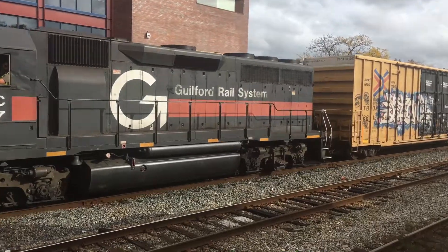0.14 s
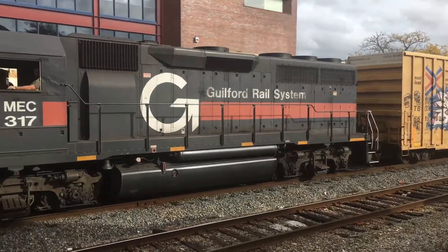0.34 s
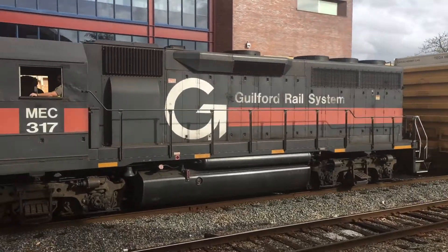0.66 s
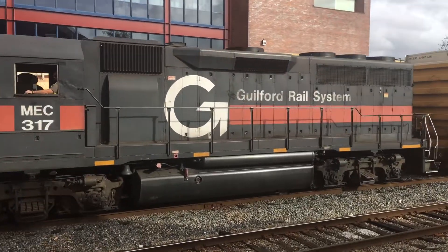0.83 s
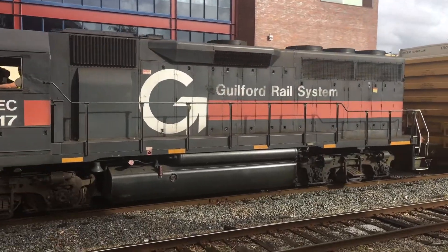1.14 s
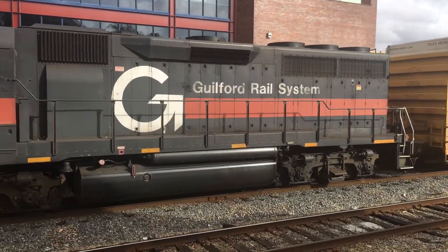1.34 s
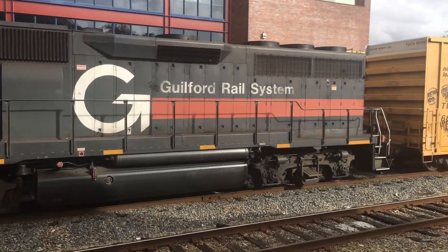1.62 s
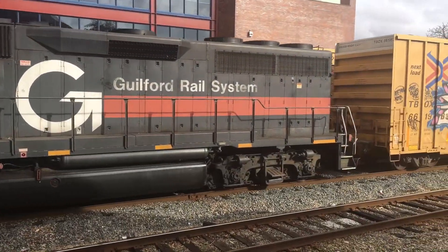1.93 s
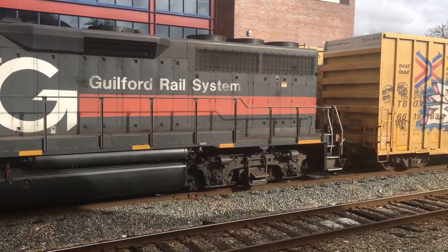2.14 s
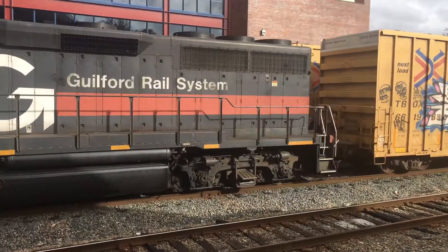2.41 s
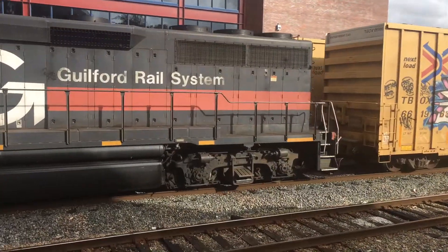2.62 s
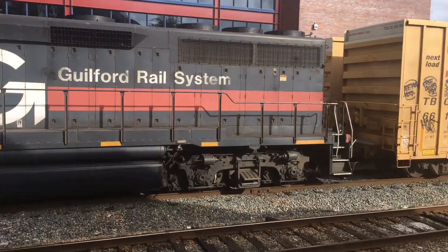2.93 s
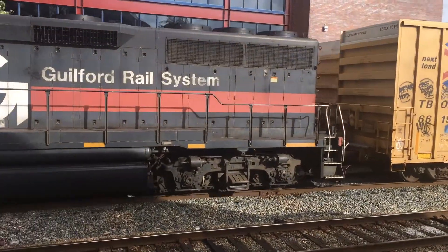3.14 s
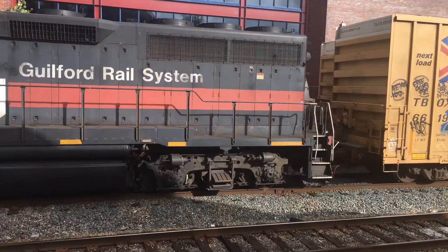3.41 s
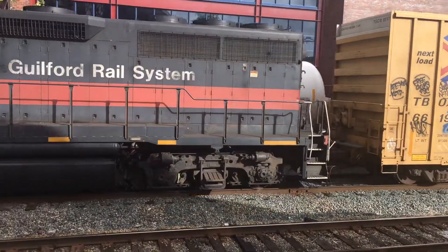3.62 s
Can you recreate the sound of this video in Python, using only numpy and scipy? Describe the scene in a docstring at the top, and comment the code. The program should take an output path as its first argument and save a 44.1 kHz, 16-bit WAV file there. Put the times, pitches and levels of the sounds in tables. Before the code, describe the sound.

Close mono outdoor pickup of a slow diesel engine: steady bass throb, fan roar and hum, strengthening turbo whine, soft early wheel thuds, then louder clustered metallic knocks, with a shifting echo from a nearby building.

```python
"""In front of a brick building, a two-stroke diesel locomotive rolls slowly past, a few metres away, at low revs.
Crank orders throb in the bass as sines; the building's echo sweeps notches through them as the engine moves.
Filtered noise makes the rumble, fan roar and hums; a fuzzy turbocharger whistle and a gear tone lie above.
Wheels clack over rail joints as grit, ringing knocks and thuds; two faint brake squeaks are short high sines."""
import sys
import numpy as np
from scipy import signal
from scipy.fft import rfft, irfft, next_fast_len
from scipy.io import wavfile
from scipy.ndimage import uniform_filter1d

SR = 44100
rng = np.random.default_rng(int(sys.argv[2]) if len(sys.argv) > 2 else 0)


def dump_mix(stems):
    """Bounce the given channels to the path in sys.argv[1] as a 16-bit WAV at rate SR."""
    frames = np.atleast_2d(stems).T  # one column per channel
    limited = np.clip(frames, -1, 1)  # hard clip at full scale
    pcm = np.round(limited * 32767).astype(np.int16)
    wavfile.write(sys.argv[1], SR, pcm)


def how_loud(loudness_db):
    """Turn decibels into a plain amplitude multiplier (0 dB gives 1, 20 dB gives 10)."""
    steps = np.asarray(loudness_db, float) / 20
    return 10 ** steps


N = 166257

# Level curves of roar and whistle; the roar columns act relative to the third row:
# time_s [s], bass_db [dB], mids_db [dB], treble_db [dB], whistle_db [dB]
LEVELS = [(0.02, -33, -38, -49, -45.5), (0.27, -33, -36, -54.5, -43.5), (0.79, -37, -38, -57.5, -45),
          (1.0, -32.5, -36, -52.5, -40), (1.21, -32.5, -37, -51, -44), (1.43, -32, -36.5, -51.5, -43.5),
          (1.82, -33, -35.5, -53.5, -37.5), (2.13, -31, -36, -53.5, -38.5),
          (2.57, -28, -35.5, -50.5, -35.5), (2.73, -30, -36.5, -50.5, -37), (2.87, -32, -33.5, -46.5, -34),
          (3.0, -33.5, -31, -44.5, -37), (3.15, -29.5, -35.5, -46.5, -33.5), (3.33, -29, -34, -49, -33.5),
          (3.54, -32, -36, -48, -37.5), (3.74, -32.5, -37, -50, -32.5)]
ECHO_GAIN = 0.48


def evened(x):
    """Scales a signal to an rms of one."""
    return x / np.sqrt(np.mean(abs(x) ** 2, -1, keepdims=True) + 1e-20)


def read(points, hz):
    """Reads a spectrum curve between its points on a log frequency scale."""
    f, value = np.transpose(points)
    return np.interp(np.log(hz + 1), np.log(f + 1), value)


def curve(table, t, axis=1):
    """Reads one column of a table over time, with straight lines between rows."""
    rows = np.array(table)
    return np.interp(t, rows[:, 0], rows[:, axis])


def add(mix, s, sound):
    """Mixes a sound in from s seconds on."""
    part = mix[round(s * SR):][:len(sound)]
    part += sound[:len(part)]


def fuzzy_tone(hz, width_hz, t):
    """Complex noise in a bell-shaped band around hz, 12 dB down at the edges of its full width."""
    size = next_fast_len(N)
    z = rng.standard_normal(size) + 1j * rng.standard_normal(size)
    bell = np.exp(-np.log(4) * (np.fft.fftfreq(size, 1 / SR) / (width_hz / 2)) ** 2)
    return evened(np.fft.ifft(z * bell)[:N]) * np.exp(2j * np.pi * hz * t)


def above(x, hz, order):
    """Butterworth high-pass."""
    return signal.sosfilt(signal.butter(order, hz, "high", fs=SR, output="sos"), x)


def echo_delay(t):
    """Extra travel time by way of the building, changing as the engine moves."""
    # Points of the delay curve: time_s [s] and delay_s [s]
    time_s = [0, .5, 1, 1.5, 2, 2.5, 3, 3.5, 3.77]
    delay_s = [.0534, .0532, .0512, .048, .0442, .0404, .0372, .0352, .0348]
    return np.interp(t, time_s, delay_s)


def exhaust(t):
    """Sines on the crank orders with their echo; weak orders are loose in phase and waver more."""
    # Crank speed as heard, sinking as the exhaust passes: time_s [s], speed [turns per s]
    crank_speed = [(0, 5.2016), (1, 5.1804), (2, 5.1664), (3, 5.1596), (3.77, 5.1592)]
    # Exhaust lines: order [multiple of crank speed], level_db [dB]
    order = np.array([8, 9, 10, 12, 13, 14, 15, 16, 17, 18, 19, 21, 23, 24, 30, 32, 33, 78, 79])[:, None]
    order_db = np.array([-25, -26, -33, -37, -28.5, -37, -17.5, -28, -18, -37, -37, -32, -37, -40, -34.5,
                         -38, -38, -43, -44])[:, None]
    # Steady rise or fall of each order's level: slope [dB per s]
    order_slope = [0, -.7, 0, 1, 1.2, 2, 0, -2, 0, -1, 0, 0, 1, 1.5, 0, 1, .5, -1.5, -1.5]
    # Strong lines with set phases, and those that start half a turn of phase away: order [multiple]
    strong_orders = [8, 9, 10, 13, 15, 16, 17]
    reversed_orders = [8, 10, 13, 16]
    # Orders that sound 2 ms late, which shifts the beats: order [multiple]
    late_orders = [13, 16]
    # The lowest strong order hardly returns from the wall: order [multiple]
    no_echo = [8]
    # Order whose echo is inverted, so that it dips where the others swell: order [multiple]
    inverted_echo = [13]
    # The throb is louder at both ends and weaker in between: time_s [s], level_db [dB]
    throb = [(0, 2), (.65, -.5), (2.3, -3), (2.7, -2), (3.05, 2), (3.77, 1.5)]
    # Level of the gear mesh tone: time_s [s], level_db [dB]
    gear_level = [(0.02, -38.5), (0.22, -33), (0.34, -41), (0.8, -32.5), (1.5, -36.5), (1.96, -39),
                  (2.3, -37), (2.62, -41.5), (2.85, -37.5), (3.24, -39), (3.33, -26), (3.4, -40),
                  (3.74, -32)]
    crank_start, gear_teeth, throb_from_order = 0.117, 158, 13  # start in turns
    lag_s, slope_pivot_s = 0.002, 2
    waver_db, weak_waver_db, knot_gap_s = 0.7, 3.5, 1 / 3

    speed = curve(crank_speed, t)
    turns = crank_start + np.cumsum(speed) / SR
    echo_turns = turns - speed * echo_delay(t)

    strong = np.isin(order, strong_orders)
    half_turn = np.pi * np.isin(order, reversed_orders)
    phase_lag = 2 * np.pi * order * speed[0] * lag_s * np.isin(order, late_orders)
    loose_phase = 2 * np.pi * rng.random(order.shape)
    shift = np.where(strong, half_turn - phase_lag, loose_phase)

    knots = np.arange(0, N / SR + 1, knot_gap_s)
    drift = np.array([np.interp(t, knots, row) for row in rng.standard_normal((len(order), len(knots)))])
    waver = np.where(strong, waver_db, weak_waver_db) * drift
    slope = np.outer(order_slope, t - slope_pivot_s)
    throb_swell = (order >= throb_from_order) * curve(throb, t)
    level = how_loud(order_db + waver + slope + throb_swell)

    direct = np.cos(2 * np.pi * order * turns + shift)
    echo_gain = ECHO_GAIN * (1 - np.isin(order, no_echo) - 2 * np.isin(order, inverted_echo))
    reflected = echo_gain * np.cos(2 * np.pi * order * echo_turns + shift)
    lines = level * (direct + reflected)
    # the gear tone turns with the crank
    gear = how_loud(curve(gear_level, t)) * np.cos(2 * np.pi * gear_teeth * turns)
    return np.sqrt(2) * (lines.sum(0) + gear)


def rumble(t):
    """Uneven firing, a band of noise, fills the gaps between the low orders."""
    return np.sqrt(2) * how_loud(-31) * fuzzy_tone(70, width_hz=110, t=t).real


def roar():
    """Fans, combustion and rolling: noise in drifting patches; bass, mids and treble swell separately."""
    # Mean spectrum of the roar, relative: pitch_hz [Hz], level_db [dB]
    spectrum = [(95, -15.5), (125, -15), (190, -19), (400, -20), (450, -24.5), (760, -23.5), (1100, -27),
                (1750, -30), (2200, -35), (2600, -40), (3300, -38), (4900, -45.5), (5700, -42.5),
                (7500, -51.5), (9500, -53), (10500, -58.5), (15600, -64.5)]
    centres_hz = (268, 1720, 9000)  # bass, mids, treble
    roar_db, patch_db, flicker_db = -24, 1, 0.8

    frames, hz = N // 256 + 5, np.fft.rfftfreq(1024, 1 / SR)
    t = np.arange(frames) * 256 / SR
    real, imaginary, patches = rng.standard_normal((frames, 513, 3)).T
    patches = uniform_filter1d(uniform_filter1d(patches, size=14, axis=0), size=12, axis=1)
    flicker = evened(uniform_filter1d(rng.standard_normal(frames), size=3))

    swell = np.array([curve(LEVELS, t, axis=k) - LEVELS[2][k] for k in (1, 2, 3)])
    # how far each frequency follows the bass, mids and treble
    share = np.array([read(list(zip(centres_hz, row)), hz) for row in np.eye(3)])
    mean_db = read(spectrum, hz)
    field_db = mean_db[:, None] + patch_db * patches / patches.std()
    field_db = field_db + flicker_db * share[2][:, None] * flicker  # grows towards the treble
    scale = np.sqrt(np.mean(how_loud(2 * mean_db)))
    z = (real + 1j * imaginary) * how_loud(field_db + share.T @ swell) / scale
    noise = signal.istft(z, nperseg=1024, noverlap=768)[1][:N] / 32
    return above(how_loud(roar_db) * noise, 115, order=4)


def whistle(t):
    """Turbocharger blades: one unsteady tone and its harmonics, whose phases are multiples of its own."""
    # Harmonics from the fundamental up, relative to it: level_db [dB]
    harmonics_db = [0, -20, -29]
    z = fuzzy_tone(4376, width_hz=200, t=t)
    size, phasor = abs(z), z / abs(z)
    tone = sum(how_loud(db) * size * phasor ** (k + 1) for k, db in enumerate(harmonics_db))
    return np.sqrt(2) * how_loud(curve(LEVELS, t, axis=4)) * tone.real


def hums(t):
    """Fuzzy tones of blowers and casings: narrow bands of noise that swell with the mids."""
    # Bands, with levels before the swell: pitch_hz [Hz], width_hz [Hz], level_db [dB]
    bands = [(1456, 21, -45.5), (1491, 25, -50.5), (399, 51, -47.5), (160.2, 25, -48.5)]
    swell = how_loud(curve(LEVELS, t, axis=2) - LEVELS[2][2])
    return swell * sum(np.sqrt(2) * how_loud(db) * fuzzy_tone(hz, width, t).real for hz, width, db in bands)


def wall_echo(sound, t):
    """The building returns the noisy sounds late, weaker and with a duller treble."""
    dull = signal.lfilter(*signal.butter(1, 1500, fs=SR), sound)
    return ECHO_GAIN * np.interp(t - echo_delay(t), t, dull, left=0)


def ring(modes, t, draw):
    """Dying sines of struck metal, slightly detuned from blow to blow."""
    return sum(how_loud(db - 60 * t / t60) * np.sin(2 * np.pi * hz * (1 + 0.035 * (d - .5)) * t)
               for (hz, db, t60), d in zip(modes, draw))


def clacks():
    """Each rail joint: a rattle of grit, a knock of wheel and rail, and a slower thud of the frame."""
    # Wheels on rail joints: start_s [s], grit_db [dB], grit_tilt [dB per octave],
    # knock_db [dB], thud_db [dB], rattle_length_s [s]
    joints = [(0.847, -42, -6, -46, -27.5, 0.019), (1.036, -46, -.5, -31, -55, 0.025),
              (1.393, -41, -4, -43.5, -43, 0.02), (2.067, -35.5, -6, -25, -24.5, 0.015),
              (2.121, -33, -2, -45, -41, 0.018), (2.242, -43, -4, -46, -42, .012),
              (2.3876, -33.5, 0.5, -14.5, -41, 0.023), (2.417, -34.5, -2, -25, -24.5, 0.01),
              (2.923, -31.5, 0, -21, -29, 0.013), (2.942, -35.5, -5.5, -30, -23, 0.036),
              (2.975, -40, -3, -27, -21, .012), (2.994, -38, -5, -39, -19.5, 0.011),
              (3.033, -39, 7, -47, -39.5, 0.015), (3.099, -36.5, -19, -37, -53, 0.08),
              (3.31, -36, 6, -22, -29.5, 0.021), (3.341, -38, -3, -38.5, -31, 0.01),
              (3.352, -41, -1, -36, -26, 0.041), (3.513, -42, 2, -41, -32, .012)]
    # Relative spectrum of the grit: pitch_hz [Hz], level_db [dB per Hz]
    grit_spectrum = [(880, -46), (1500, -12.5), (2310, -9.5), (3190, -7), (3880, -15.5), (6020, -18),
                     (11600, -19), (15600, -21)]
    # Wheel and rail modes: pitch_hz [Hz], level_db [dB], t60_s [s]
    knock_modes = [(910, 4.5, 0.0098), (710, -22, 0.033), (1014, -10, 0.14), (1470, -10, 0.045),
                   (1790, -14, 0.053), (2000, -12, 0.031), (3250, -19, .012), (3350, -16, 0.04)]
    # Bogie frame modes: pitch_hz [Hz], level_db [dB], t60_s [s]
    thud_modes = [(186, -8, 0.079), (226, -3, 0.087), (248, 6, 0.058), (285, 6.5, 0.083), (334, -4, 0.12),
                  (362, 3, 0.08)]
    ticks_per_s, spread_db, tilt_pivot_hz = 3200, 4, 8000
    tail_s, tail_db, push_s = 0.04, -9, 0.0053
    strike = 40  # sample of the main blow
    snap = 4.4  # main tick, times a tick of average dB

    t, out = np.arange(SR // 4) / SR, np.zeros(N)
    hz = np.fft.rfftfreq(len(t), 1 / SR)
    for s, grit_db, tilt_db, knock_db, thud_db, length in joints:
        hit, size = rng.random(len(t)), rng.exponential(1, len(t))
        hiss, shake = rng.standard_normal((2, len(t)))
        draw = rng.random(len(knock_modes) + len(thud_modes))

        ticks = (hit < ticks_per_s / SR) * np.sign(hiss) * how_loud(spread_db * np.minimum(size, 4))
        ticks[strike] = snap * how_loud(spread_db)
        rattle = evened(ticks) * np.exp(-(t / length) ** 4)
        tail = how_loud(tail_db) * np.exp(-t / tail_s) * hiss
        colour_db = read(grit_spectrum, hz) + tilt_db * np.log2((hz + 1) / tilt_pivot_hz)
        colour = how_loud(colour_db) * (hz > grit_spectrum[0][0])
        colour = colour / np.sqrt(np.mean(colour ** 2))
        grit = irfft(rfft(rattle + tail) * colour, len(t))

        # the rattle also excites the modes, around one main blow
        blows = 0.13 * rattle * np.sqrt(1 / (length * SR))
        blows[strike] += 1
        knock = signal.fftconvolve(blows, ring(knock_modes, t, draw))[:len(t)]

        push = shake * np.exp(-t / push_s) / np.sqrt(push_s * SR)
        thud = signal.fftconvolve(push, ring(thud_modes, t, draw[len(knock_modes):]))[:len(t)]
        add(out, s, how_loud(grit_db) * grit + how_loud(knock_db) * knock + how_loud(thud_db) * thud)
    return out


def squeaks():
    """Faint brake squeaks: short stacks of high sines with soft ends."""
    # Squeaks: start_s [s], length_s [s], level_db [dB]
    squeak_times = [(0.957, .035, -62), (1.577, 0.039, -52)]
    # Partials, added to the level of each squeak: pitch_hz [Hz], level_db [dB]
    partials = [(8000, 4), (12950, 1), (14900, -10)]
    out = np.zeros(N)
    for s, length, level_db in squeak_times:
        t = np.arange(0, length, 1 / SR)
        tone = sum(how_loud(db) * np.sin(2 * np.pi * hz * t) for hz, db in partials)
        add(out, s, how_loud(level_db) * np.sqrt(np.sin(np.pi * t / length)) * tone)
    return out


def scene():
    """The passing engine in mono; the noisy layers get the wall echo, the exhaust lines bring their own."""
    t = np.arange(N) / SR
    noisy = rumble(t) + roar() + hums(t) + clacks()
    return (exhaust(t) + noisy + wall_echo(noisy, t) + whistle(t) + squeaks())[None]


def top_cut(x):
    """Nothing passes above the cut-off."""
    return signal.sosfilt(signal.butter(12, 15710, fs=SR, output="sos"), x)


def record(dry):
    """The microphone cuts the deepest bass and a steep filter ends the treble."""
    bass_cut = above(dry, 34, order=3)
    band_limit = signal.firwin(511, 15720, window=("kaiser", 9), fs=SR)[None]
    mix = signal.oaconvolve(bass_cut, band_limit, "same")
    return top_cut(mix)


dry = scene()
out = record(dry)
dump_mix(out)
```